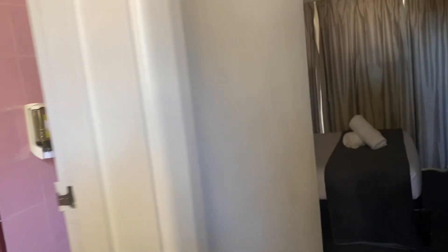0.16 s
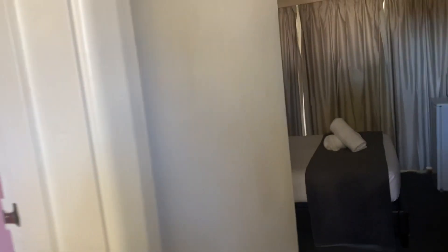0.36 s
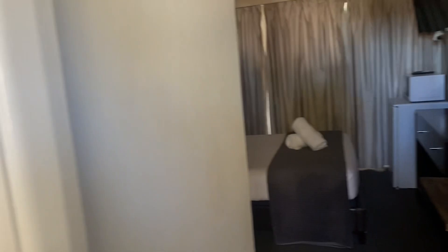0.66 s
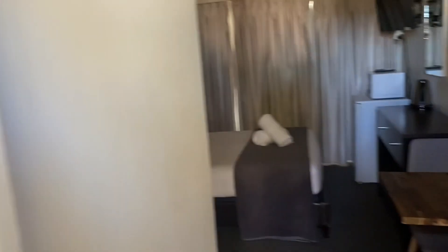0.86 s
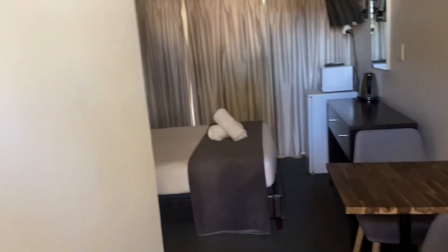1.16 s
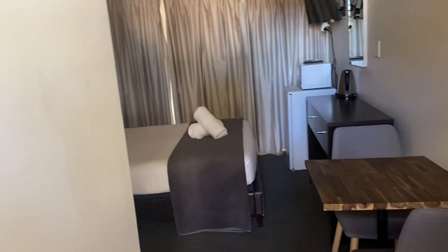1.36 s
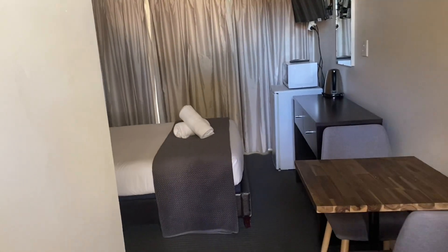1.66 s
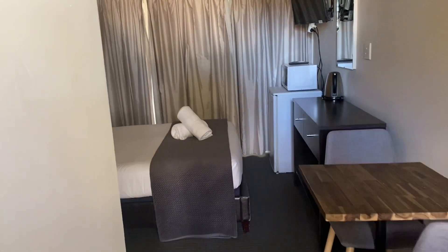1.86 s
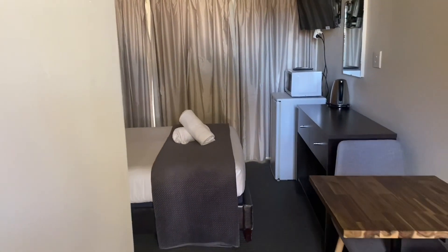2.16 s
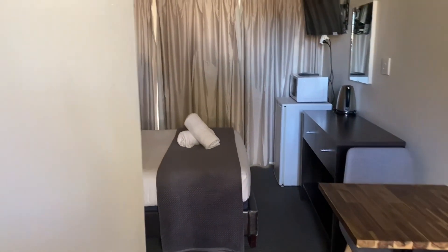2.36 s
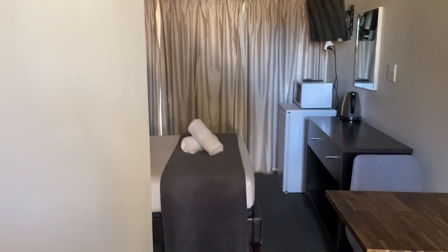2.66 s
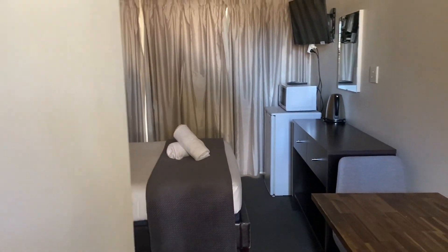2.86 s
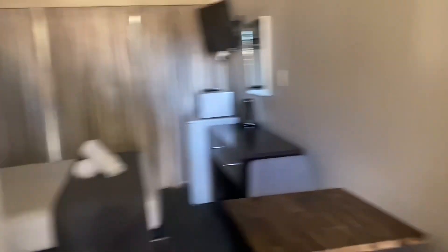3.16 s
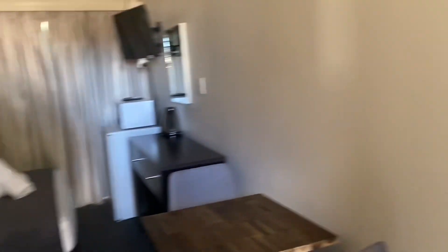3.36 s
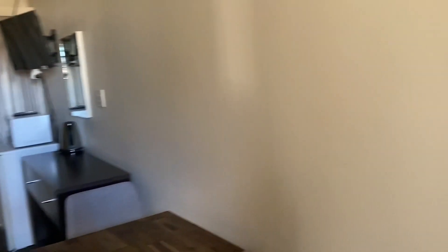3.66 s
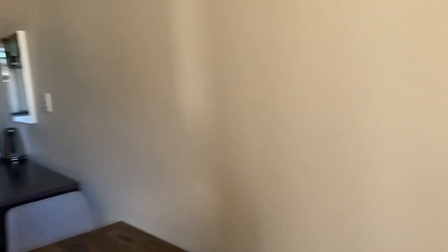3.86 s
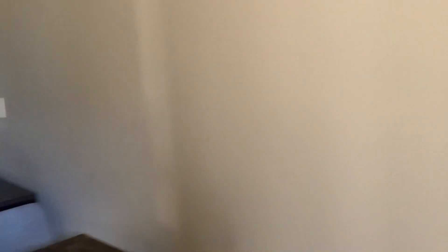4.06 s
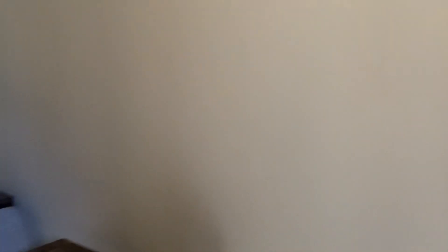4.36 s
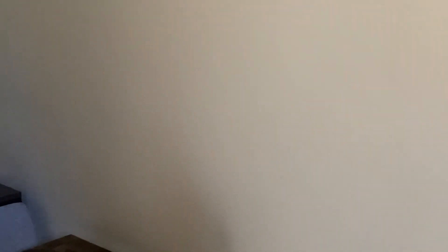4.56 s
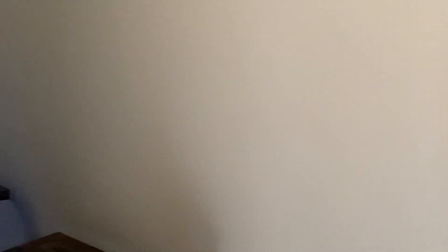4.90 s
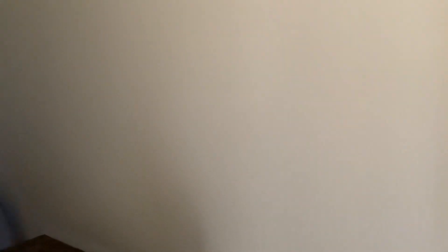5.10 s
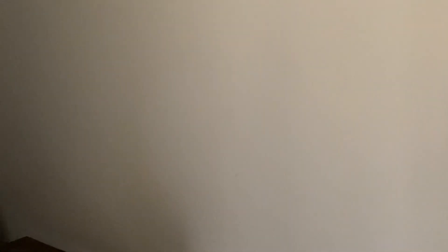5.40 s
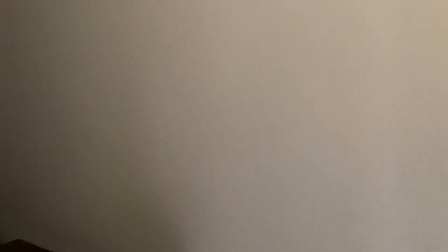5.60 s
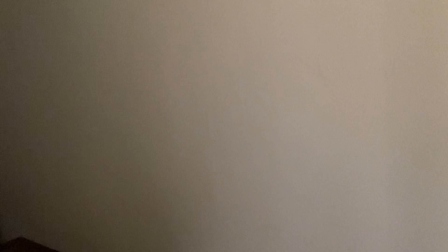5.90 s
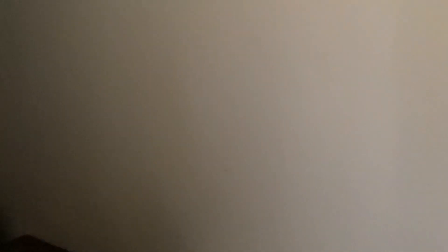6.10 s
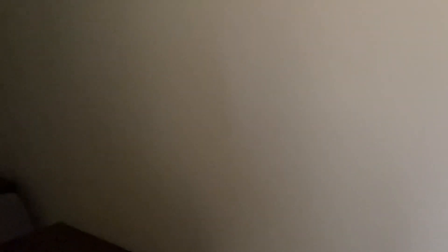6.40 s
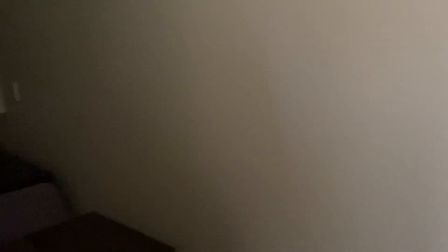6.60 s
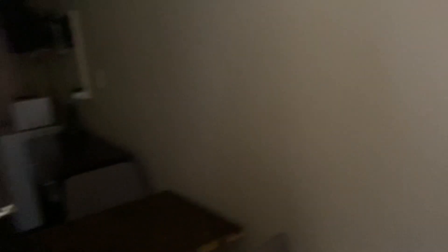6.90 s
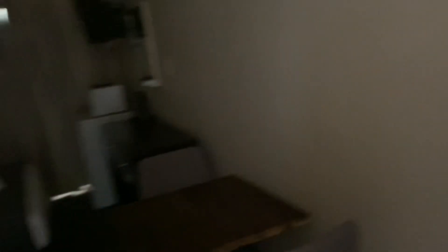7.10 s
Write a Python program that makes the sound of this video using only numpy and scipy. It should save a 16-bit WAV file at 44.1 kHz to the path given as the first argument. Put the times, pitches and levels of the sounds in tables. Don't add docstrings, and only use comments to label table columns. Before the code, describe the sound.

Close in a small curtained room, a cane raps a hollow door loudly at the start, with a deep heel thump. Soft shuffles, clothing rustle and thin metallic tinks follow. Midway come dull finger ticks, low floor thuds and a sharp wall tap, then a crisp knock on a hard edge. Later a scraping, rattling burst of cane contacts stands out, then one lighter tap, over faint fridge hum and low room murmur.

```python
import sys
import numpy as np
from scipy import signal
from scipy.io import wavfile

SR = 44100
rng = np.random.default_rng(int(sys.argv[2]) if len(sys.argv) > 2 else 0)


def file_out(sig):
    cols = np.atleast_2d(sig).T
    lim = np.clip(cols, -1, 1)
    pcm = np.round(lim * 32767).astype(np.int16)
    wavfile.write(sys.argv[1], SR, pcm)


def attenuation_scalar(level_db):
    decades = np.asarray(level_db, float) / 20
    return 10 ** decades


N = 319548
T = np.arange(N) / SR
SLOW = T[::40]


def rms_one(x):
    return x / np.sqrt(np.mean(x ** 2) + 1e-20)


def at_hz(points, hz):
    point_hz, point_db = np.transpose(points)
    return np.interp(np.log(hz), np.log(point_hz), point_db)


def band(x, low_hz, high_hz):
    sos = signal.butter(2, [low_hz, min(high_hz, 0.45 * SR)], "band", fs=SR, output="sos")
    return signal.sosfilt(sos, x)


def drift(rate_hz):
    r = np.exp(-80 * np.pi * rate_hz / SR)
    white = rng.standard_normal(len(SLOW) + 2000)
    return rms_one(signal.lfilter([1], [1, -2 * r, r * r], white)[2000:])


def ring(clicks, hz, t60_s):
    r = attenuation_scalar(-60 / (t60_s * SR))
    w = 2 * np.pi * hz / SR
    return signal.lfilter([0, np.sin(w)], [1, -2 * r * np.cos(w), r * r], clicks + 1e-18)


def clicks_at(seconds, db):
    out = np.zeros(N)
    out[np.round(np.asarray(seconds) * SR).astype(int)] = attenuation_scalar(np.asarray(db))
    return out


def dying(shape, t60_s):
    t = T[:shape[-1]]
    build_up = np.clip(t / 0.009, 0, 1) ** 2
    return rng.standard_normal(shape) * attenuation_scalar(-60 * t / t60_s) * build_up


def room(x, t60_s, wet_db):
    tail = dying((SR // 2,), t60_s) / np.sqrt(0.005 * SR)
    return x + attenuation_scalar(wet_db) * signal.fftconvolve(x, tail)[:N]


def add(out, seconds, db, sounds):
    for s, gain, sound in zip(seconds, attenuation_scalar(db), sounds):
        out[round(s * SR):][:len(sound)] += gain * sound


def swells(rows):
    s, rise_s, fall_s, db, more_db = np.transpose(rows)[:, :, None]
    late_s = SLOW - s
    gain = attenuation_scalar(db - 10 * (late_s / np.where(late_s < 0, rise_s, fall_s)) ** 2)
    return np.linalg.norm(gain, axis=0), np.linalg.norm(gain * attenuation_scalar(more_db), axis=0)


def banded_noise(gain_at, patchy_db):
    out = 0
    edges_hz = 26 * 2 ** np.arange(0, 9.7, 0.4)
    white = rng.standard_normal((2, N))
    for k, (low_hz, high_hz) in enumerate(zip(edges_hz, edges_hz[1:])):
        gain = gain_at(np.sqrt(low_hz * high_hz)) * attenuation_scalar(patchy_db * drift(10.5))
        out = out + np.interp(T, SLOW, gain) * band(white[k % 2], low_hz, high_hz)
    return out


# start in seconds, peak in dB, brightness in dB per octave, extra room in dB.
ON_DOOR = [(0.1077, -15.5, -2, -17), (0.1102, -19, -0.7, 0.5), (0.1184, -20, -2, 2.9)]
DOOR_FOOT = [(0.7701, -28, 0.18, -3.5), (0.7805, -29, -1.1, -1.6)]
ON_WALL = [(3.6097, -33, 1.2, .1), (3.614, -28, 1, .1), (3.6179, -29.5, -1.9, .1)]
ON_EDGE = [(0.153, -51.5, 7, 6), (4.625, -35, -0.3, 8), (4.6276, -34, 1.5, 8), (4.6432, -23.5, -1.9, -12),
           (4.6462, -25.5, -1.8, -0.5), (6.1561, -28, 2.4, -1.5), (6.1658, -34.5, 1, -4)]
SKID = [(5.5607, -36, 0.93, 0.11), (5.5646, -22.5, 1.1, .1), (5.5739, -26, -0.29, .1),
        (5.5838, -21, -0.69, .1), (5.5883, -22, -0.14, .1), (5.5931, -19.5, -0.91, .1),
        (5.6031, -23, -2.7, .1)]
ON_TUBE = [(2.0635, -36, -.7, -2.5), (2.0677, -48, .1, 4)]
SOLE_DOWN = [(0.7034, -44, -1, 2.5), (1.6858, -47.5, 0.8, 5), (1.6948, -48, 2.3, 2.5),
             (1.7061, -44, -2, -2), (1.9209, -48, -0.5, -6), (2.362, -56, 0.2, 3.5), (3.8489, -45, 0.3, 0),
             (3.8576, -42, 1.5, -4.5), (5.963, -62, 2.5, 1), (7.0185, -51, 1.5, 4.5)]
SOLE_DRAG = [(4.0795, -36, 1, -1), (4.105, -38, 0.037, 0), (4.1389, -36.5, -0.38, 1.7),
             (4.162, -34.5, -.4, -4.5)]
# click, thud, knock, clack, grit, all in dB.
COLOURS = [
    (-6.5, -15, -7, 0.5, -38),
    (-15.5, -23, 2.5, -11, -35),
    (2, -9, -10, 3.3, -7.5),
    (-0.7, -26, -25, -11.5, -3),
    (3, -14.5, -10.5, -8, -1),
    (0.5, -28, -30, -11, -14),
    (1.3, -2.2, -1, 1.3, -28),
    (-7, 3, -11, -19, -28),
]
# click, thud, knock, clack, grit, all in dB.
ECHOES = [(-12.5, -22.5, -3.5, -8.5, -32), (-26, -12, 0.2, -35, -30), (-4, -7, -4.5, -0.1, -13),
          (-1.5, -18, -19.5, -11, -12.5), (-2, -21, -22.5, -14, -9), (-1, -35, -38, -24, -10),
          (1, -3, -3, 0, -13), (-4.5, -7.5, -10, -6, -28)]
# low in Hz, high in Hz, skid in ms, room t60 in seconds, room level in dB.
BANDS = [
    (2240, 5200, 3.2, 0.34, -20),
    (128, 390, 11, 0.36, -6),
    (376, 827, 2.5, 0.33, -9.5),
    (874, 2000, 4.6, 0.35, -12.5),
    (5900, 10870, 1.87, 0.3, -14.5),
]
FRONT_DB = [1.3, 2.4, 2.8, 3.36, 4.8]
# pitch in Hz, level in dB, t60 in seconds.
ROOM_MODES = [(183.5, -47.5, 0.17), (270.2, -56.5, 0.43)]


def contacts():
    kinds = [ON_DOOR, DOOR_FOOT, ON_WALL, ON_EDGE, SKID, ON_TUBE, SOLE_DOWN, SOLE_DRAG]
    s, db, tilt, room_db = np.vstack(kinds).T
    counts = [len(rows) for rows in kinds]
    colour_db = np.repeat(COLOURS, counts, axis=0)
    echo_db = np.repeat(ECHOES, counts, axis=0)
    out = np.zeros(N + SR)
    shape = (len(s), 2000)
    grit = rng.standard_normal(shape) * rng.exponential(1, shape) ** 0.55
    grit[:, 8] += 3.0
    for k, (low_hz, high_hz, skid_ms, t60_s, wet_db) in enumerate(BANDS):
        level_db = db + tilt * np.log2(np.sqrt(low_hz * high_hz) / 1500)
        bursts = band(grit * np.exp(-T[:2000] * 1000 / skid_ms), low_hz, high_hz)
        bursts = band(bursts, low_hz * 0.46, high_hz * 1.7)
        bursts = bursts / np.abs(bursts).max(axis=1, keepdims=True)
        tails = band(dying((len(s), SR // 3), t60_s), low_hz, high_hz)
        tails = tails / np.std(tails[:, :2000])
        add(out, s, level_db + colour_db[:, k] + FRONT_DB[k], bursts)
        add(out, s, level_db + echo_db[:, k] + wet_db + room_db, tails)
    direct = out[:N]
    return direct + sum(attenuation_scalar(db) * ring(direct, hz, t60_s) for hz, db, t60_s in ROOM_MODES)


# start in seconds, blow in dB.
KNOCKS = [
    (0.1085, -26.5),
    (0.1106, -17.5),
    (0.1182, -15),
    (0.771, -38),
    (0.781, -39.5),
]
# pitch in Hz, level in dB, t60 in seconds.
DOOR = [(580, -20, 5.0), (650, -20, 0.47), (728, -0.5, 0.38), (836, 2, 0.62), (923.5, -6.5, 0.2),
        (1016, -9, 0.25), (1142, -14, 5.0), (1316, -17.5, 4.8), (1430, -11.5, 0.19), (1624, -17, 0.56),
        (1595, -13.5, 0.012), (1890, -27.5, 5.0)]


def door():
    s, blow_db = np.transpose(KNOCKS)
    panel = 0
    for hz, db, t60_s in DOOR:
        strength_db = blow_db + db + rng.normal(0, 2.2, len(s))
        panel = panel + ring(clicks_at(s, strength_db), hz, min(t60_s, 0.064))
    return room(panel, t60_s=0.4, wet_db=-12)


# start in seconds, blow in dB, favoured pitch in Hz, loss in dB per octave.
TINKS = [
    (0.719, -40, 6589, 51),
    (0.726, -46, 6589, 43),
    (2.061, -41.5, 4300, 12),
    (2.0682, -36, 7500, 6),
]
# pitch in Hz, level in dB, t60 in seconds.
TUBE = [(3418, -6, .012), (4393, 3, .02), (6589, 2, .018), (7760, -5, .012), (9238, -3, .016),
        (12150, -5, .012)]


def tube():
    s, blow_db, best_hz, focus_db = np.transpose(TINKS)
    modes = 0
    for hz, db, t60_s in TUBE:
        loss_db = focus_db * np.abs(np.log2(hz / best_hz))
        modes = modes + ring(clicks_at(s, blow_db + db - loss_db), hz, t60_s)
    return room(band(modes, 3000, 13000), t60_s=0.3, wet_db=-5)


# peak in seconds, rise in seconds, fall in seconds, level in dB, pitch in Hz.
SLIDES = [
    (2.0, 0.02, 0.042, -66, 2750),
    (2.45, 0.07, 0.14, -70.5, 3200),
    (2.92, .08, .08, -86, 7000),
]


def slides():
    out = 0
    for s, rise_s, fall_s, db, hz in SLIDES:
        gain = swells([(s, rise_s, fall_s, db, 0)])[0]
        whisper = rms_one(band(rng.standard_normal(N), hz / 1.1, hz * 1.1))
        out = out + np.interp(T, SLOW, gain) * whisper
    return out


# start in seconds, peak in dB, pitch in Hz.
POPS = [(0.535, -49, 310), (1.497, -39.5, 520), (3.205, -37, 516), (3.22, -40, 425), (3.237, -41.5, 301),
        (3.36, -69, 331), (5.117, -32, 504), (6.902, -63, 372)]


def pops():
    out, t = np.zeros(N), T[:600]
    for s, db, hz in POPS:
        cycles = hz * t + 0.6 * (1 - np.exp(-t * hz))
        decay = attenuation_scalar(-60 * cycles / 8.0)
        out[round(s * SR):][:600] += attenuation_scalar(db + 4) * np.sin(2 * np.pi * cycles) * decay
    return band(out, 150, 1100)


# start in seconds, peak in dB, pitch in Hz, swell in seconds, t60 in
# seconds.
HEELS = [(0.161, -16, 46, 0.0091, 0.36), (1.702, -27.5, 47.3, 0.0091, 0.75),
         (3.214, -30.5, 69.7, 0.0044, 0.19), (3.327, -27.5, 73.5, .005, 0.075),
         (3.365, -28.5, 59, 0.0045, 0.055), (3.627, -41.5, 88, 0.011, 0.41), (3.869, -19, 46, 0.13, 0.27),
         (4.13, -32, 54, 0.022, 0.2), (3.635, -36, 171, .01, 0.27), (4.086, -34, 129, .01, 0.22),
         (4.158, -33, 250, 0.0054, 0.073), (5.613, -35.5, 47.6, .03, 0.4), (6.163, -43, 267.2, 0.0093, .45),
         (6.952, -35, 48.5, 0.039, 0.56)]


def heels():
    out, t = np.zeros(N + SR), T[:SR // 2]
    for s, db, hz, swell_s, t60_s in HEELS:
        phase = 2 * np.pi * (hz * t + 0.34 * (1 - np.exp(-t / 0.016)))
        decay = attenuation_scalar(-60 * t / t60_s - 49 * (t / t60_s) ** 2)
        shape = (1 - np.exp(-t / swell_s)) ** 1.7 * decay
        add(out, [s], [db], [shape / shape.max() * np.sin(phase)])
    return out[:N]


# peak in seconds, rise in seconds, fall in seconds, soles in dB,
# floor boom above them in dB.
SHUFFLES = [(0.0, .05, .03, -49, 25.5), (0.33, 0.3, 0.076, -56.5, 15), (0.6, 0.24, 0.45, -50, 1.5),
            (0.9, 0.14, 0.073, -68, 9), (1.2, 0.16, 0.32, -59, 6), (1.65, 0.18, 1, -60, -10),
            (2.5, 0.18, 0.23, -54.5, -25), (3.3, 0.16, .4, -53, 11), (3.72, .08, 0.11, -59, 5),
            (3.95, 0.11, 0.036, -61.5, 27.5), (4.14, 0.16, 0.24, -49.5, 2), (4.62, 0.23, 0.6, -57.5, -8),
            (4.98, 0.045, 0.6, -57, 6), (5.35, 0.13, 0.21, -78, -1), (5.75, 0.34, 0.18, -54, 10),
            (6.33, 0.21, 0.27, -54.5, -2), (6.91, 0.047, 0.089, -57, 8), (7.24, .1, .1, -52.5, -13)]
# peak in seconds, rise in seconds, fall in seconds, sleeve in dB,
# fabric hiss above it in dB.
SWISHES = [(0.0, .05, 0.038, -53.5, -7.5), (0.2, 0.11, 0.095, -47, -10), (0.69, .35, 0.084, -56, -3),
           (1.15, 0.17, 0.31, -58, -12.5), (1.43, 0.12, 0.14, -63, 0), (1.8, 0.21, 0.29, -64.5, -6.5),
           (2.03, 0.082, 0.19, -64.5, -4), (2.4, 0.18, 0.32, -63, -17.5), (2.85, 0.12, 0.092, -85, -21.5),
           (3.25, 0.15, 0.46, -65, -3), (3.55, 0.16, 0.31, -58, -10), (4.08, 0.14, 0.41, -57.5, -1.5),
           (4.38, 0.16, 0.48, -56, -1), (4.95, 0.056, 0.092, -55.5, -2.5), (5.4, 0.29, 0.17, -51, 1),
           (6.0, 0.43, 0.6, -77.5, 1), (6.5, 0.56, 0.56, -71.5, -2), (6.78, 0.099, 0.25, -63, 3),
           (7.0, 0.25, 0.1, -68, 8), (7.24, 0.29, .1, -61, -4)]
STILL_DB = [-58, -69.5, -69, -83]
MOTION_HZ = [60, 330, 1600, 7000]
# frequency in Hz, density in dB per Hz.
RUSTLE = [(18, -34), (30, -11.5), (55, 10.5), (88, -14.5), (134, -9), (157, -22.5), (189, -15),
          (473, -23.5), (526, -22.5), (1350, -23.5), (1670, -18.5), (9220, -28), (16000, -38.5)]
# frequency in Hz, density in dB per Hz.
MURMUR = [(18, -58.5), (30, -27), (42, 3), (64, 3), (77, -7), (88, -17), (131, -14.5), (210, -35.5),
          (866, -59), (1130, -31), (1220, -9), (1460, -41), (16000, -92)]
MURMUR_DB = -22


def movement():
    soles, boom = swells(SHUFFLES)
    sleeve, hiss = swells(SWISHES)
    gains, lifts_db = (boom, soles, sleeve, hiss), (-7.5, 9.0, -2.33, -2.0)
    curves_db = [20 * np.log10(np.hypot(gain, attenuation_scalar(still_db))) + lift_db
                 for gain, still_db, lift_db in zip(gains, STILL_DB, lifts_db)]

    def gain_at(hz):
        shares = [np.interp(np.log(hz), np.log(MOTION_HZ), row) for row in np.eye(len(MOTION_HZ))]
        rustle = attenuation_scalar(31 + at_hz(RUSTLE, hz) + np.dot(shares, curves_db))
        return np.hypot(rustle, attenuation_scalar(MURMUR_DB + at_hz(MURMUR, hz)))

    high_pass = signal.butter(4, 36, "high", fs=SR, output="sos")
    return signal.sosfilt(high_pass, banded_noise(gain_at, patchy_db=2.0))


# pitch in Hz, width in Hz, level in dB.
HUM = [(125.4, 5.4, -56)]


def fridge():
    out = 0
    for hz, width_hz, db in HUM:
        out = out + attenuation_scalar(db) * rms_one(ring(rng.standard_normal(N), hz, 1.54 / width_hz))
    return out


def scene():
    cane = contacts() + door() + tube() + slides()
    walker = pops() + heels() + movement()
    return (cane + walker + fridge())[None]


def band_limit(x):
    return signal.sosfilt(signal.butter(12, 16480, fs=SR, output="sos"), x)


def record(dry):
    cut_hz = 15800
    soft = 0.55 * np.tanh(dry / 0.55)
    low_pass = signal.cheby2(12, 40, cut_hz * 1.045, fs=SR, output="sos")
    return band_limit(signal.sosfilt(low_pass, soft))


dry = scene()
out = record(dry)
file_out(out)
```